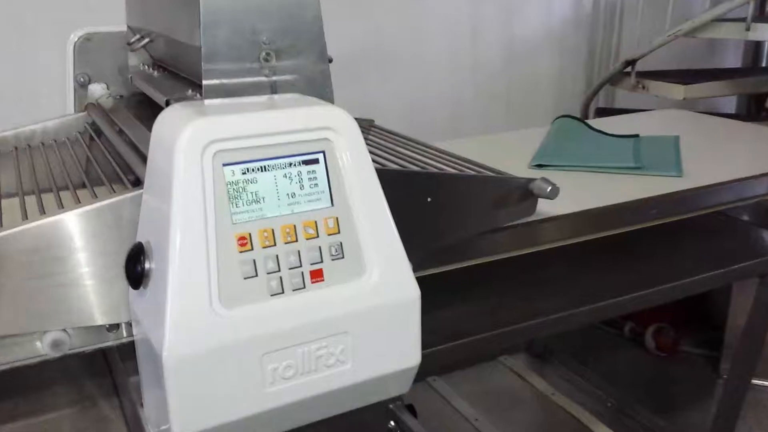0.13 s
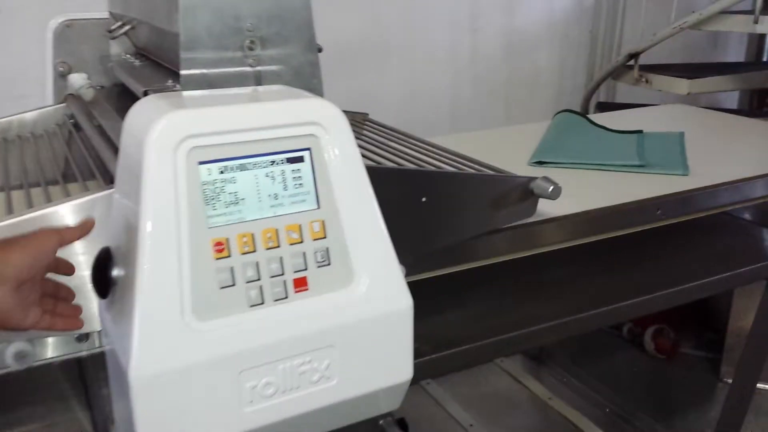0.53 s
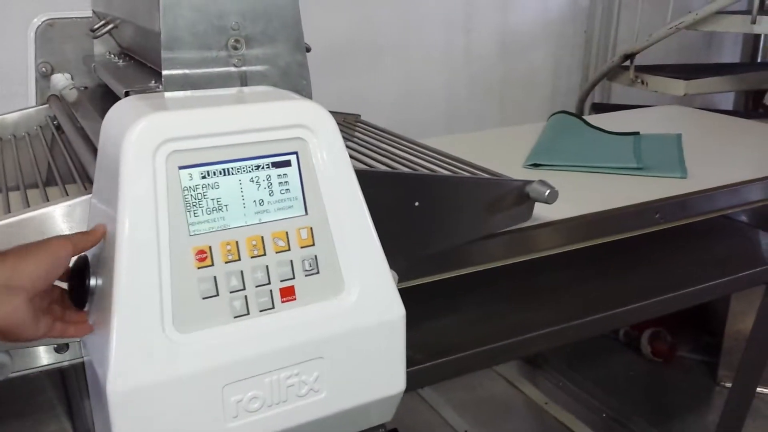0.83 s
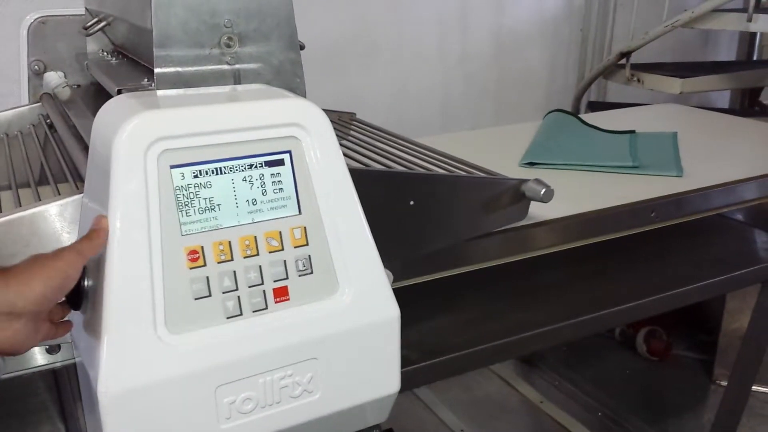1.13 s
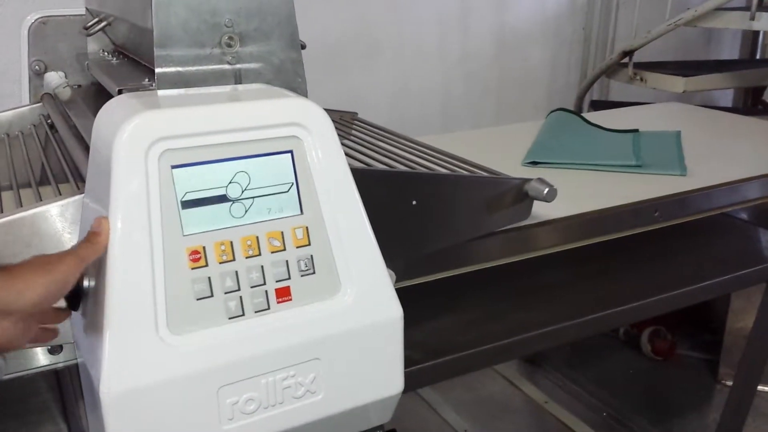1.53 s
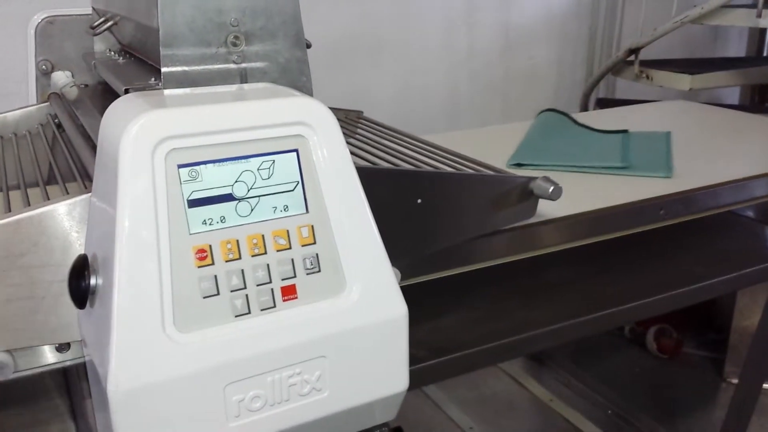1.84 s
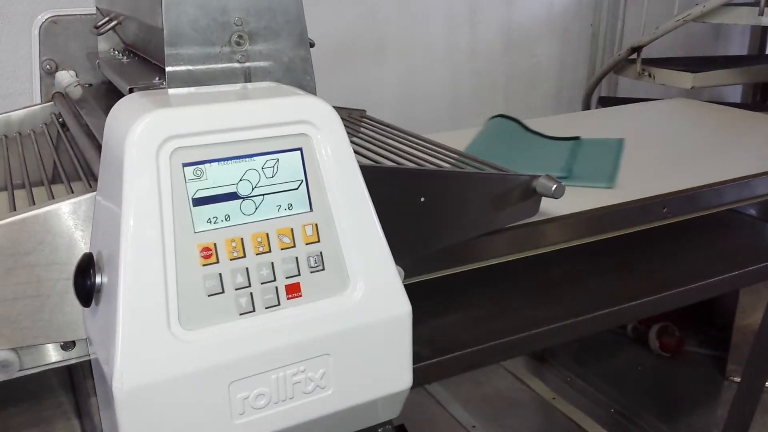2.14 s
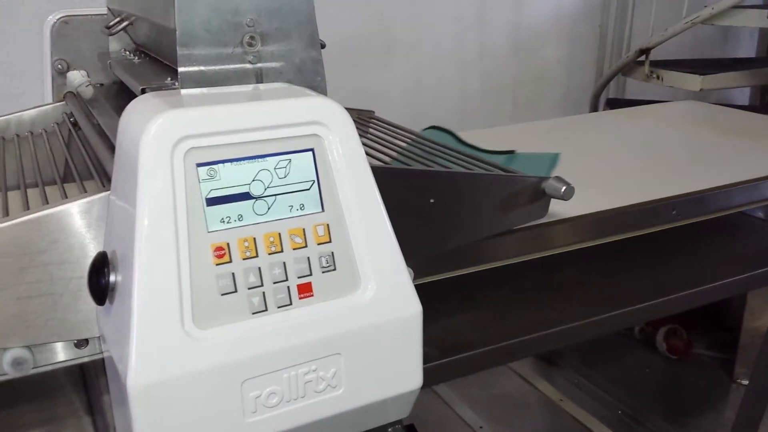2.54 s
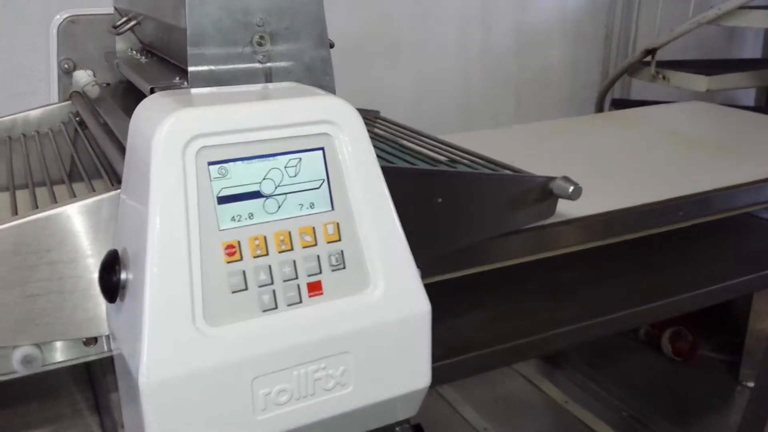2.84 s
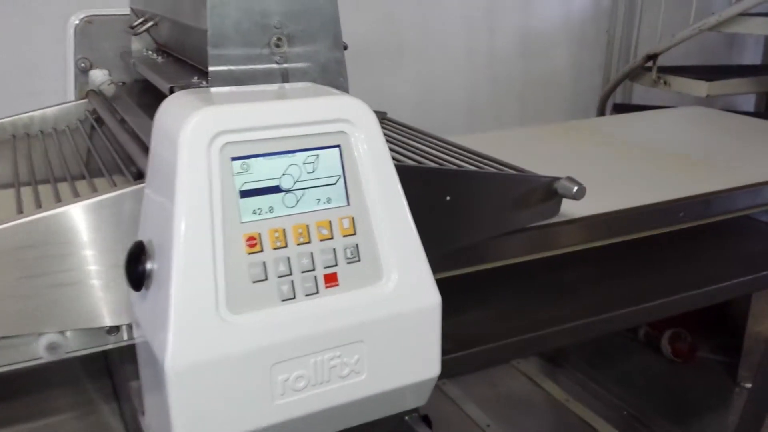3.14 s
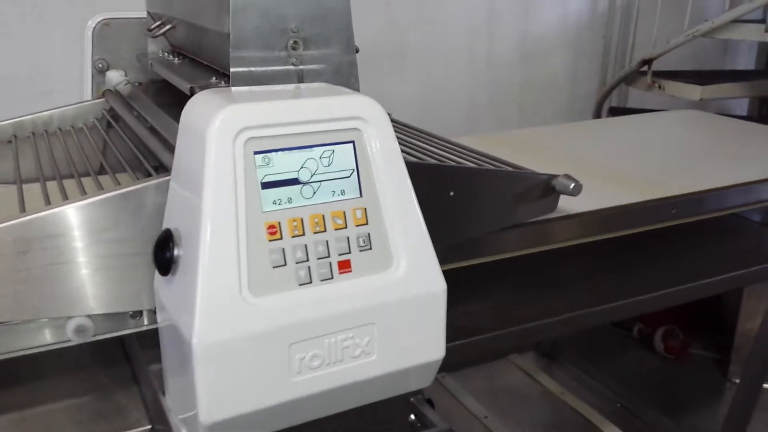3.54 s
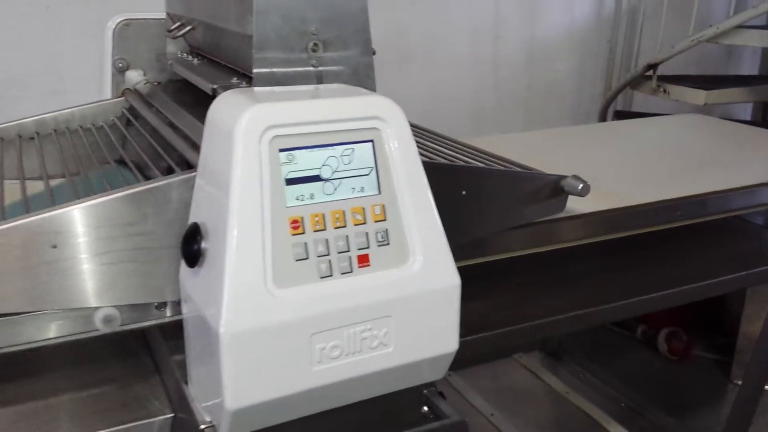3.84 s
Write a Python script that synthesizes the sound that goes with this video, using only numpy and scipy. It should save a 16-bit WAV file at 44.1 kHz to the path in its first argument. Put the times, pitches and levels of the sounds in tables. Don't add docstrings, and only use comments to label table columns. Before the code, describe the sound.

Dough rolling machine close to the microphone; quiet room air and finger ticks give way to metallic clunks with short echo, then buzzing motor, gears and hissing belts run steadily until a brief rising groan.

```python
import sys
import numpy as np
from scipy import signal
from scipy.fft import rfft, irfft
from scipy.io import wavfile

SR = 44100
rng = np.random.default_rng(int(sys.argv[2]) if len(sys.argv) > 2 else 0)


def amplitude_ratio(level_db):
    exponent = np.asarray(level_db, float) / 20
    return 10 ** exponent


def inscribe(sig):
    pcm = np.round(np.clip(np.atleast_2d(sig).T, -1, 1) * 32767)
    wavfile.write(sys.argv[1], SR, pcm.astype(np.int16))


N = 176400
T = np.arange(N) / SR

# frequency in Hz, left-right correlation.
LIKENESS_BY_HZ = [(60, 0.86), (180, 1), (530, 0.88), (1580, -0.0035), (4690, -0.062), (14000, 0.081)]
# frequency in Hz, left over right in dB.
BALANCE_BY_HZ = [(60, -.5), (300, -.7), (700, 0), (1200, 5), (2300, -3), (5500, 9), (9500, 1), (12800, -12)]
# frequency in Hz, density in dB per Hz.
AIR_SPECTRUM = [(15, -37), (25, -3.5), (124, 2.5), (312, -5.5), (728, -17.5), (866, -15), (1300, -19),
                (2500, -26), (3250, -56), (5500, -120)]
# frequency in Hz, density in dB per Hz.
HISS_SPECTRUM = [(1500, 1), (3000, 4.5), (5000, 2.5), (6200, 7.5), (8000, 2.5), (14500, -3.5)]
# centre in seconds, half length in seconds, pitch in Hz, width in Hz, level in dB.
SLEEVE_BRUSHES = [
    (0.45, .12, 1050, 1400, -58.5),
    (0.734, 0.075, 218, 68, -52.5),
    (0.66, 0.21, 1600, 910, -68),
    (0.993, 0.058, 6200, 3100, -60),
    (1.06, 0.078, 6300, 2500, -65),
]
# start in seconds, peak in dB, pitch in Hz, T60 in seconds.
KNOB_TICKS = [(0.651, -42, 2080, 0.021), (.735, -53, 3400, .015), (.884, -41, 4100, 0.0086),
              (0.891, -41, 4000, 0.011), (1.121, -42, 3980, .012), (1.135, -41, 332, 0.16),
              (1.133, -42, 800, 0.051), (1.563, -43, 3500, 0.013), (1.57, -44, 1500, 0.014),
              (1.722, -46, 2330, 0.022)]
CLUNK_STARTS_S = [
    1.2445,
    1.636,
    1.764,
]
# casing level in dB, echo level in dB.
CLUNK_LEVELS = [
    (-27, -37),
    (-17.5, -33),
    (-20, -33.5),
]
# start in seconds, peak in dB, pitch in Hz, T60 in seconds.
CLUNK_CRACKS = [
    (1.2445, -30, 1900, .04),
    (1.2445, -33, 3500, .03),
    (1.636, -27, 1500, .04),
    (1.637, -23, 3700, .02),
    (1.763, -22, 1500, .05),
    (1.764, -23, 6500, .05),
]
# pitch in Hz, level in dB, T60 in seconds.
CASING_MODES = [(126, -34, 0.067), (208, -11, .2), (268, 4, 0.12), (319, -2.5, 0.21), (410, -5, 0.099),
                (498, -3, 0.14), (712, 1.5, 0.1), (800, 0.5, 0.11), (890, -6, 0.13), (1190, -12.5, 0.034)]
# frequency in Hz, density in dB per Hz.
ECHO_SPECTRUM = [(70, -30), (130, -6), (300, 0), (560, -9), (850, -4), (1150, -21), (3500, -27),
                 (7000, -48)]
# start in seconds, pitch in Hz, level in dB, T60 in seconds.
FRAME_JOLTS = [
    (1.778, 100, -22.5, 0.99),
    (1.785, 167, -27, 0.7),
    (1.778, 205, -19, 0.55),
    (1.78, 410, -21, 0.36),
]
# frequency in Hz, density in dB per Hz.
RUMBLE_SPECTRUM = [(25, -11), (60, -8), (100, -4.5), (200, -1), (450, -2.5), (570, -34), (720, -10.5)]
# pitch in Hz, width in Hz, level in dB.
PANEL_MODES = [(67.5, 15, -25), (112.7, 9.5, -2.5), (166.6, 33, -1), (212.5, 29, 3.5), (240.6, 7.5, 0),
               (298, 25, 6), (374.5, 19.6, 1), (438, 10, 4.5), (496, 8.3, -22.5), (703, 35, 5),
               (945, 20, -8.5)]
# time in seconds, level in dB.
LOAD_CURVE = [(1.74, -48), (1.75, -92), (1.76, -29.5), (1.83, -23), (2.16, -23), (2.49, -24.5), (2.7, -23),
              (2.73, -26), (2.89, -22.5), (3.0, -25), (3.98, -24), (4.0, -25)]
# frequency in Hz, density in dB per Hz.
BELT_SPECTRUM = [(500, -6), (1000, -2), (2300, -4.5), (2750, -10), (6200, -11.5), (7600, -20),
                 (11000, -24.5), (14500, -42.5)]
# frequency in Hz, gain in dB.
KNOCK_SPECTRUM = [(200, -12), (600, -7), (1200, 0), (1500, -3), (2000, -7), (2400, -5), (2600, -22),
                  (6500, -28)]
# multiple of the shaft rate, level in dB.
MESH_LINES = [(5, -38), (9, -46), (13, -46), (18, -38), (22, -44), (23, -46), (24, -37), (25, -41),
              (26, -45), (28, -47), (29, -42), (32, -48), (33, -48), (36, -38), (37, -50), (45, -36),
              (46, -48), (47, -47), (48, -46), (72, -46), (105, -55), (121, -56)]

OPEN_S, OPEN_RISE_S, AIR_RISE_S = 0.39, 0.014, 0.049
MIC_LOW_HZ, MIC_TOP_HZ = 67.4, 14900
AIR_DB, HISS_DB = -52, -66.5
HUM_HZ, HUM_DB = 300, -60
CONTACT_HZ, ECHO_T60_S = 1500, 0.6
START_S, RUNUP_S, SURGE_DB, SURGE_S = 1.775, 0.017, 6, 0.11
THUMP_DB, THUMP_S, THUMP_TOP_HZ = 5, 0.3, 220
RUMBLE_DB, PANEL_DB = -29, -31.5
BELT_DB = -3.5
WHINE_HZ, WHINE_WIDTH_HZ, WHINE_DB = 6480, 650, -18
SHAFT_HZ, SHAFT_WANDER_RAD, COMB_DB = 49.27, 0.03, -36
MESH_IN_S, MESH_FLUTTER_DB = 0.2, 2.4
GROAN_S, GROAN_ATTACK_S, GROAN_DB = 3.966, 0.0058, -15
GROAN_HZ, GROAN_RISE_HZ_PER_S = 242.4, 2120
DIP_HZ, DIP_SHARE = 2670, 0.37


def rms_one(x):
    return x / np.sqrt(np.mean(x ** 2) + 1e-20)


def at_hz(points, hz):
    curve_hz, value = np.transpose(points)
    return np.interp(np.log(hz), np.log(curve_hz), value)


def rise(start_s, length_s):
    return 1 - np.exp(-np.maximum(T - start_s, 0) / length_s)


def fall(start_s, length_s):
    return np.exp(-np.maximum(T - start_s, 0) / length_s)


def click_at(start_s):
    return 1. * (np.arange(N) == int(start_s * SR))


def drift(rate_hz):
    r = np.exp(-80 * np.pi * rate_hz / SR)
    slow = signal.lfilter([1], [1, -2 * r, r * r], rng.standard_normal(N // 40 + 2002))[2000:]
    return np.interp(np.arange(N) / 40, np.arange(len(slow)), rms_one(slow))


def ring(clicks, hz, t60_s):
    r, w = amplitude_ratio(-60 / (t60_s * SR)), 2 * np.pi * hz / SR
    return signal.lfilter([0, np.sin(w)], [1, -2 * r * np.cos(w), r * r], clicks + 1e-18)


def sides(hz):
    return amplitude_ratio(at_hz(BALANCE_BY_HZ, hz) * np.array([[.5], [-.5]]))


def pair(white, hz):
    alike = np.clip(at_hz(LIKENESS_BY_HZ, hz), -.99, .99)
    mid = np.sqrt(1 + alike) * white[0]
    side = np.sqrt(1 - alike) * white[1] * [[1], [-1]]
    return sides(hz) * (mid + side) / np.sqrt(2)


def banded(spectrum, patchy_db, rate_hz):
    out, edges_hz = 0, 25 * 2 ** np.arange(0, 9.3, .4)
    white = rng.standard_normal((2, 2, N))
    for k, (low, high) in enumerate(zip(edges_hz, edges_hz[1:])):
        hz = np.sqrt(low * high)
        if spectrum[0][0] * .8 < hz < spectrum[-1][0] * 1.2:
            sos = signal.butter(2, [low, high], "band", fs=SR, output="sos")
            band = signal.sosfilt(sos, white[k % 2])
            out = out + amplitude_ratio(at_hz(spectrum, hz) + patchy_db * drift(rate_hz)) * pair(band, hz)
    return out / np.std(out.mean(axis=0))


def resonant(hz, t60_s, size=N):
    white = rng.standard_normal((2, size + 1))
    return pair([rms_one(np.diff(ring(w, hz, t60_s))) for w in white], hz)


def tone(phase, hz, flutter_db):
    shift = np.clip(1 - at_hz(LIKENESS_BY_HZ, hz), 0, 1) * rng.uniform(-1.18, 0.9)
    angle = phase + 2 * np.pi * rng.random() + shift * np.array([[1], [-1]])
    line = sides(hz) * np.sin(angle) * amplitude_ratio(flutter_db * drift(5))
    return line / np.std(line.mean(axis=0))


def burst(start_s, db, hz, cycles, t60_s):
    out, start, size = np.zeros((2, N)), int(start_s * SR), SR // 5
    puff = amplitude_ratio(-60 * T[:size] / t60_s) * resonant(hz, cycles / hz, size=size)
    puff = ring(puff * np.minimum(T[:size] * hz / 2, 1), hz, cycles / hz)
    out[:, start:start + size] = amplitude_ratio(db) * puff / np.abs(puff).max()
    return out


def brushes():
    out = 0
    for s, half_s, hz, width_hz, db in SLEEVE_BRUSHES:
        out = out + amplitude_ratio(db) * np.exp(-((T - s) / half_s) ** 2) * resonant(hz, 6.6 / width_hz)
    return out


def room():
    air = amplitude_ratio(AIR_DB) * banded(AIR_SPECTRUM, patchy_db=2.5, rate_hz=3.9)
    hum = amplitude_ratio(HUM_DB) * tone(2 * np.pi * HUM_HZ * T, HUM_HZ, flutter_db=2.1)
    hiss = amplitude_ratio(HISS_DB) * banded(HISS_SPECTRUM, patchy_db=1.5, rate_hz=9.6)
    return (air + hum + brushes()) * rise(OPEN_S, AIR_RISE_S) ** 2 + hiss


def ticks():
    return sum(burst(s, db, hz, 3.5, t60_s) for s, db, hz, t60_s in KNOB_TICKS)


def clunks():
    out = sum(burst(s, db, hz, 3.0, t60_s) for s, db, hz, t60_s in CLUNK_CRACKS)
    echo, soft = 0, signal.butter(4, CONTACT_HZ, fs=SR)
    for s, (db, echo_db) in zip(CLUNK_STARTS_S, CLUNK_LEVELS):
        click = signal.lfilter(*soft, click_at(s))
        for hz, mode_db, t60_s in CASING_MODES:
            hit_db = db + mode_db - 10.5 + rng.normal(0, 4.3)
            out += amplitude_ratio(hit_db) * sides(hz) * ring(click, hz, t60_s)
        echo = echo + amplitude_ratio(echo_db - 60 * np.maximum(T - s, 0) / ECHO_T60_S) * rise(s, 0.001)
    return out + echo * banded(ECHO_SPECTRUM, patchy_db=2.0, rate_hz=7.1)


def jolt():
    return sum(amplitude_ratio(db) * rise(s, 0.018) * ring(click_at(s), hz, t60_s) for s, hz, db, t60_s in FRAME_JOLTS)


def casing():
    shake_db = THUMP_DB * fall(START_S, THUMP_S)
    panels = 0
    for hz, width_hz, db in PANEL_MODES:
        level = amplitude_ratio(db + shake_db * (hz < THUMP_TOP_HZ)) * np.sqrt(width_hz)
        panels = panels + level * resonant(hz, 2.5 / width_hz)
    rumble = amplitude_ratio(RUMBLE_DB) * banded(RUMBLE_SPECTRUM, patchy_db=1.5, rate_hz=3.3)
    surge = rise(START_S, RUNUP_S) * amplitude_ratio(SURGE_DB * fall(START_S, SURGE_S))
    return surge * (rumble + amplitude_ratio(PANEL_DB) * rms_one(panels))


def belts():
    s, db = np.transpose(LOAD_CURVE)
    load = amplitude_ratio(np.interp(T, s, db, left=-120))
    hiss = amplitude_ratio(BELT_DB) * banded(BELT_SPECTRUM, patchy_db=0.74, rate_hz=5.5)
    whine = amplitude_ratio(WHINE_DB + 2.0 * drift(3)) * resonant(WHINE_HZ, 3.3 / WHINE_WIDTH_HZ)
    return load * (hiss + whine)


def groan():
    since = np.maximum(T - GROAN_S, 0)
    turns = since * (GROAN_HZ + .5 * GROAN_RISE_HZ_PER_S * since)
    return amplitude_ratio(GROAN_DB) * np.sqrt(2) * rise(GROAN_S, GROAN_ATTACK_S) * np.sin(2 * np.pi * turns)


def shaft():
    turn = SHAFT_HZ * T + SHAFT_WANDER_RAD * drift(2.27) / (2 * np.pi)
    knocks = np.diff(np.floor(turn), prepend=0) * amplitude_ratio(6.0 * drift(18))
    colour = amplitude_ratio(at_hz(KNOCK_SPECTRUM, np.fft.rfftfreq(N, 1 / SR) + 1))
    body = rfft(rng.standard_normal((2, 800)), N) * colour
    comb = amplitude_ratio(COMB_DB) * rms_one(irfft(rfft(knocks) * body, N))
    mesh = sum(amplitude_ratio(db) * tone(2 * np.pi * k * turn, k * SHAFT_HZ, MESH_FLUTTER_DB) for k, db in MESH_LINES)
    return (comb + mesh) * rise(START_S, MESH_IN_S)


def machine():
    drive = casing() + belts() + groan() + shaft()
    return drive - DIP_SHARE * signal.lfilter(*signal.iirpeak(DIP_HZ, 4.5, fs=SR), drive)


def scene():
    return room() + ticks() + clunks() + jolt() + machine()


def roll_off(x):
    return signal.sosfilt(signal.butter(12, 14550, fs=SR, output="sos"), x)


def record(dry):
    low_cut = signal.butter(2, MIC_LOW_HZ, "high", fs=SR, output="sos")
    top_cut = signal.cheby2(20, 50, MIC_TOP_HZ, fs=SR, output="sos")
    opened = dry * np.clip((T - OPEN_S) / OPEN_RISE_S, 0, 1)
    mix = signal.sosfilt(np.vstack([low_cut, top_cut]), opened)
    return roll_off(mix)


dry = scene()
out = record(dry)
inscribe(out)
```